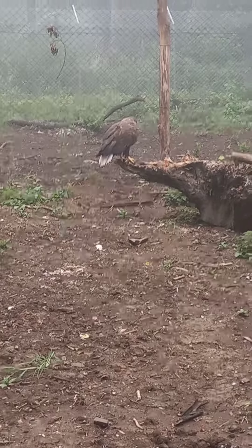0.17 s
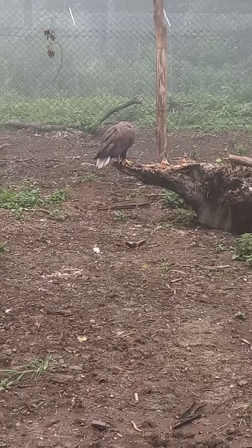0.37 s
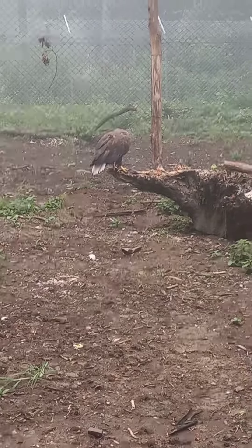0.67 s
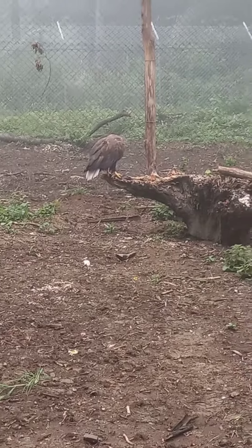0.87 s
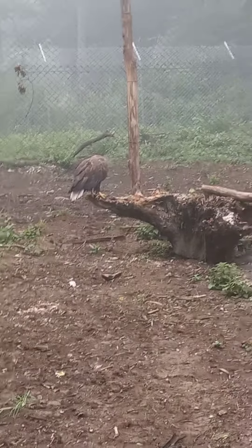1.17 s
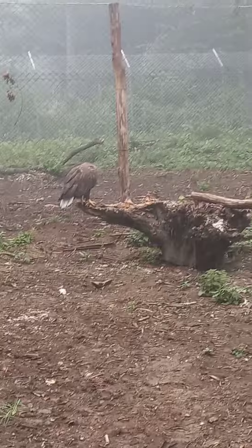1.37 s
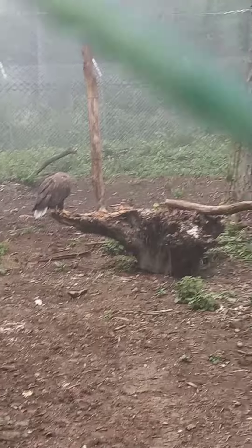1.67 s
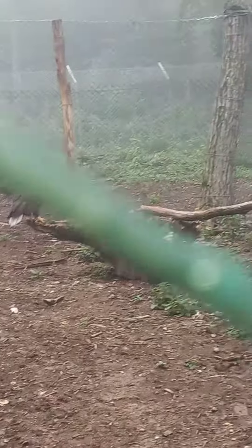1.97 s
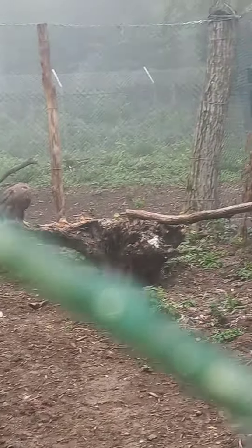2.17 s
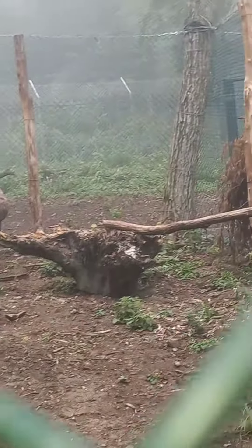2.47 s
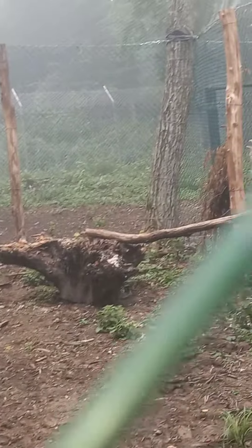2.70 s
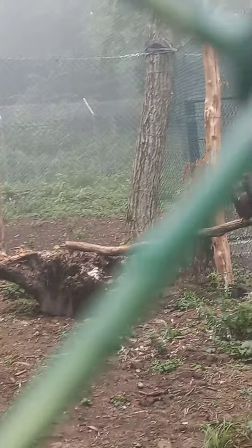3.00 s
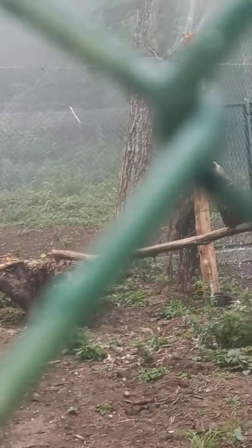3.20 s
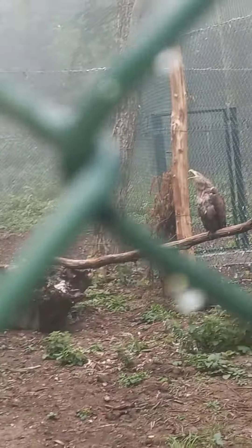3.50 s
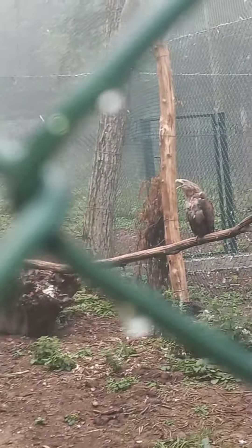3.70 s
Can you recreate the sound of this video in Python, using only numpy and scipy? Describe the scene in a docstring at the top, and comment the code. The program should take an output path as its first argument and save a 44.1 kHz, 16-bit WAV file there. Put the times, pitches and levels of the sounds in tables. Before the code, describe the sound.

An eagle gives fast, even, hoarse whistled yelps from start to end, each closing in a low cluck, with short woodland echoes; very faint small birds and quiet hiss behind, heard in stereo, slightly right.

```python
"""Eagle in foggy woods

An eagle yelps about four times a second in a fenced clearing; trunks and ground scatter each yelp.
Each yelp is a gliding whistle with breath noise in throat resonances, ending in a low pulsed cluck.
Small birds lisp and twitter far off as blurred tones, and a dove coos as a plain falling sine.
Shaped noise makes the distant rumble and microphone hiss; one short noise tick is a drop on the fence."""
import sys
import numpy as np
from scipy import signal
from scipy.fft import rfft, irfft, next_fast_len
from scipy.io import wavfile
from scipy.ndimage import uniform_filter1d

SR = 44100
rng = np.random.default_rng(int(sys.argv[2]) if len(sys.argv) > 2 else 0)


def to_wav(s):
    """Save 16-bit WAV."""
    ch = np.atleast_2d(s).T  # columns
    pcm = np.round(np.clip(ch, -1, 1) * 32767)  # PCM
    wavfile.write(sys.argv[1], SR, pcm.astype(np.int16))


N = 169785
LEAD = 8820  # samples of bird and echo computed ahead of the first one heard

# throat resonances of the eagle: centre_hz, width_hz, level_db
THROAT = [(1240, 177, -5), (1672.4, 146, 6), (2020, 210, -0.5), (2297, 417, -8)]


def from_db(db):
    """Decibels to amplitude."""
    return 10 ** (np.asarray(db) / 20)


def rms_one(x):
    """Scale to an rms of 1."""
    return x / np.sqrt(np.mean(x ** 2) + 1e-20)


def at_hz(points, hz, order=1):
    """One column of a table, read along log frequency."""
    return np.interp(np.log(hz + 1e-9), np.log(np.array(points)[:, 0]), np.array(points)[:, order])


def drift(rate_hz, size):
    """Random wander of rms 1: noise through a double low-pass pole at rate_hz."""
    settle = 4410
    r = np.exp(-2 * np.pi * rate_hz / SR)
    wander = signal.lfilter([1], [1, -2 * r, r * r], rng.standard_normal(size + settle))
    return rms_one(wander[settle:])


def resonate(x, hz, width_hz):
    """Two-pole resonance, gain about 1 on top."""
    r = np.exp(-np.pi * width_hz / SR)
    poles = [1, -2 * r * np.cos(2 * np.pi * hz / SR), r * r]
    return signal.lfilter([(1 - r * r) / 2, 0, (r * r - 1) / 2], poles, x)


def resonances(x, table):
    """Parallel resonances, each applied twice, signs alternating."""
    out = 0
    for k, (hz, width_hz, db) in enumerate(table):
        twice = resonate(resonate(x, hz, width_hz), hz, width_hz)
        out = out + (-1) ** k * from_db(db) * twice
    return out


def eagle():
    """Sum of all yelps, each a whistle, throat rasp and pulsed cluck; begins LEAD samples early."""
    # one row per yelp; later times count from the rising peak:
    # peak_s, rise_db, rise_hz, hold_start_s, hold_hz, hold_db, hold_end_db,
    # drop_s, upper_drop_db, lower_drop_db, cluck_s, cluck_db
    yelps = [(-0.05, -61, 1734, 0.024, 1978, -46, -32.5, 0.028, -20.5, -46, 0.036, -80.5),
             (0.1899, -34, 1681, 0.0269, 2105, -32.5, -41.5, 0.045, -17.5, -38.5, 0.058, -50.5),
             (0.4315, -32, 1660, 0.027, 1938, -30, -45.5, 0.043, -24, -40.5, 0.055, -55.5),
             (0.6674, -31.5, 1743, 0.022, 1975.0, -32.5, -50.5, 0.046, -33.5, -38.5, 0.051, -46.5),
             (0.9027, -32, 1774, 0.023, 1875.0, -31, -38, 0.046, -26.5, -32, 0.059, -51),
             (1.138, -33, 1759, 0.021, 1891, -32.5, -36.5, 0.041, -26, -29.5, 0.056, -47),
             (1.3732, -33.5, 1646, 0.015, 1856, -31.5, -54, 0.015, -43.5, -27.5, 0.032, -48.0),
             (1.5824, -31.5, 1803, 0.024, 1915, -27.5, -34.5, 0.036, -32.5, -32, 0.043, -54),
             (1.8145, -33.5, 1787, 0.025, 1890, -29.5, -30.5, 0.042, -36, -30.5, 0.053, -46),
             (2.044, -30, 1773, 0.023, 1922, -31.5, -35, 0.041, -37, -29.5, 0.052, -53.5),
             (2.2772, -30.5, 1731, 0.0222, 2092, -32.5, -36, 0.043, -30, -31.5, 0.064, -52),
             (2.5111, -34, 1914, 0.0195, 1898, -26, -33.5, 0.036, -33, -31.5, 0.053, -47),
             (2.7432, -29.5, 1715, 0.024, 1917, -26.5, -44.5, 0.04, -28.5, -34.5, 0.057, -54.5),
             (2.9726, -31.5, 1815, 0.024, 1991, -28.5, -40.5, 0.04, -43, -28.5, 0.053, -46),
             (3.2058, -31.5, 1742, 0.027, 2020, -28, -31.5, 0.043, -33, -34.5, 0.063, -48.5),
             (3.505, -33, 1718, 0.022, 1964, -29.5, -37.5, 0.048, -40, -30.5, 0.065, -49.5)]
    drop_length_s = .0048
    out, size = np.zeros(N + LEAD), 6615
    t = np.arange(size) / SR - .03  # s from the rising peak
    for s, rise, rise_hz, hold_s, hz, hold, end, drop_s, upper, lower, cluck_s, cluck in yelps:
        low_s = drop_s + drop_length_s
        phase, level = whistle_arch(t, rise, rise_hz, hold_s, hz, hold, end, drop_s, upper, lower, low_s)
        voice = throat_voice(phase, level, s, hz)
        voice += cluck_and_croak(t, rise, low_s, cluck_s, cluck)
        at = LEAD + int((s + t[0]) * SR)
        out[at:at + size] += voice
    return out


def whistle_arch(t, rise, rise_hz, hold_s, hz, hold, end, drop_s, upper, lower, low_s):
    """Phase and level of one whistle: it sweeps up, crests, holds and drops in two steps."""
    onset_s, onset_hz, onset_db = .014, 1230, -22  # starts before the peak; level against the rise
    crest_s, crest_hz, crest_db = 0.00897, 2327.8, -6  # level against the hold end
    upper_hz, lower_hz, drop_length_s = 1540, 1260, .0048
    hold_end_s, dip_db, dip_s = .008, -15, .0055  # the hold ends before the drop; dips between peaks
    dwell_s, dwell_hz = .003, 70
    wobble_share, flutter_db = .015, 2.0  # rms of the pitch and level wander

    top_s, crest = min(crest_s, hold_s / 2), end + crest_db
    end_s = max(drop_s - hold_end_s, hold_s)
    # s, hz
    pitch = np.array([
        (-onset_s, onset_hz), (-onset_s / 2, onset_hz + dwell_hz),
        (-dip_s, rise_hz - 3 * dwell_hz), (dwell_s, rise_hz + dwell_hz),
        (top_s, crest_hz), (top_s + dwell_s, crest_hz),
        (hold_s - dwell_s, hz), (end_s + dwell_s, hz),
        (drop_s - dwell_s / 2, upper_hz + dwell_hz), (drop_s + dwell_s / 2, upper_hz),
        (low_s, lower_hz), (low_s + 2 * dip_s, lower_hz - dwell_hz)])
    # s, db
    effort = np.array([
        (-onset_s - dip_s, rise - 45), (-onset_s, rise + onset_db), (-dip_s, rise + dip_db),
        (-dwell_s / 2, rise), (dwell_s / 2, rise),
        (top_s - dwell_s, crest + dip_db / 2), (top_s, crest),
        (hold_s - dip_s, hold + dip_db), (hold_s, hold),
        ((hold_s + end_s) / 2, (hold + end + dip_db) / 2), (end_s, end),
        (drop_s - drop_length_s, upper + dip_db), (drop_s, upper),
        (low_s, lower), (low_s + dip_s, lower + dip_db), (low_s + 3 * dip_s, lower - 50)])

    # points that would step back in time are held at the latest time so far
    glide_hz = np.interp(t, np.maximum.accumulate(pitch[:, 0]), pitch[:, 1])
    glide_hz = uniform_filter1d(glide_hz, size=60) * (1 + wobble_share * drift(300, len(t)))
    phase = 2 * np.pi * np.cumsum(glide_hz) / SR
    db = np.interp(t, np.maximum.accumulate(effort[:, 0]), effort[:, 1])
    db = db + flutter_db * drift(430, len(t))
    return phase, from_db(uniform_filter1d(db, size=60))


def throat_voice(phase, level, s, hold_hz):
    """Whistle with a hoarse octave, its ring in the throat, and breath noise in throat and beak."""
    # upper beak resonances: multiple of the hold pitch, width_hz, level_db
    beak = [(1.65, 1240, -24), (2.1, 794, -23.5), (3.0, 1480, -39)]
    # upper rasp over the scene: s, level_db
    brightness = [(0, -3.5), (2.8, 4), (3.5, 5.5)]
    overtone_db, ring_db, rasp_db = -26.5, -8, 9
    rasp_lag_s = 0.01  # the breath follows the whistle level with this time constant

    whistle = level * np.sin(phase)
    lag = np.exp(-1 / (rasp_lag_s * SR))
    breath = signal.lfilter([1 - lag], [1, -lag], level)
    air = breath * rng.standard_normal(len(level))
    octave = (level / 2 + breath * drift(440, len(level))) * np.sin(2 * phase)
    voice = whistle + from_db(overtone_db) * octave + from_db(ring_db) * resonances(whistle, THROAT)
    beak_hz = [(k * hold_hz, width_hz, db) for k, width_hz, db in beak]
    bright = from_db(np.interp(s, *np.transpose(brightness)))
    rasp = resonances(air, THROAT) + bright * resonances(air, beak_hz)
    return voice + from_db(rasp_db) * rasp


def cluck_and_croak(t, rise, low_s, cluck_s, cluck):
    """A falling low tone ends the yelp; pulses at its pitch ring throat and chest there and at the onset."""
    # chest resonance: centre_hz, width_hz, level_db
    chest = (910, 330, -13)
    cluck_hz, cluck_length_s, fall_per_s, wobble = 640, .0047, 13, .13  # fall and wobble in log pitch
    grain_db = 1.5  # rms unevenness of the cluck tone
    chop_db, chop_s, chop_spread_db = 33.5, 0.01, 4.5  # closing pulses, against the cluck tone
    croak_db, croak_s, onset_s = 4.5, 0.0067, .014  # opening pulses, against the rise

    bend = np.clip(fall_per_s * (cluck_s - t), -.4, .05) + wobble * drift(230, len(t))
    phase = 2 * np.pi * np.cumsum(cluck_hz * np.exp(bend)) / SR
    swell = np.exp(-.5 * ((t - cluck_s) / cluck_length_s) ** 2)
    tone = from_db(cluck + grain_db * drift(140, len(t))) * swell * np.sin(phase)

    # one pulse per cycle, each of its own strength
    pulses = np.diff(phase // (2 * np.pi), prepend=0) > 0
    pulses = pulses * from_db(chop_spread_db * rng.standard_normal(len(t)))
    chop = from_db(cluck + chop_db) * np.exp(-.5 * ((t - (low_s + cluck_s) / 2) / chop_s) ** 2)
    croak = from_db(rise + croak_db) * np.exp(-.5 * ((t + onset_s / 2) / croak_s) ** 2)
    body = [(hz, 2 * width_hz, db) for hz, width_hz, db in THROAT + [chest]]
    return tone + resonances(pulses * (chop + croak), body)


def ports(x):
    """Direct sound at the two microphone ports, with level and phase differences that depend on pitch."""
    # difference between the ports: hz, left_minus_right_db, left_lead_rad
    port_rows = [(595, -3.5, 0.24), (1460, -9.5, 0.67), (2250, -2.5, 1.8963), (3980, -2.5, 1.5)]
    size = next_fast_len(len(x))
    hz = np.arange(size // 2 + 1) * SR / size
    half = from_db(at_hz(port_rows, hz) / 2) * np.exp(.5j * at_hz(port_rows, hz, order=2))
    even = np.sqrt(2 / (abs(half) ** 2 + abs(half) ** -2))  # keeps the summed power of both ports
    spectrum = rfft(x, size) * even
    return np.array([irfft(spectrum * h, size)[:len(x)] for h in (half, 1 / half)])


def woods(x):
    """Lumpy echoes from trunks and ground, dying band by band, from noise unrelated left and right."""
    # scattered sound: hz, t60_s, level_db
    scatter = [(417, 0.12, -17), (805, 0.21, 0), (1390, 0.36, -17.5), (1876, 0.94, -16),
               (2700, 0.44, -11.5), (4230, 0.42, -9.5), (6100, 0.66, -3.5)]
    build_s, early_db, early_s = .018, 5, .025  # fade-in; extra early level and its decay
    lumps_db, pan_db = 3, -2  # rms unevenness; left minus right
    t = np.arange(SR) / SR
    edges, tail = 350 * 2 ** np.arange(0, 4.6, .5), 0  # half-octave bands, Hz
    for low, high in zip(edges, edges[1:]):
        hz = np.sqrt(low * high)
        band = signal.butter(2, [low, high], "band", fs=SR, output="sos")
        noise = signal.sosfilt(band, rng.standard_normal((2, SR)))
        t60 = at_hz(scatter, hz)
        decay_db = -60 * t / t60 + early_db * np.exp(-t / early_s) + lumps_db * drift(45, SR)
        shape = from_db(decay_db) * np.clip(t / build_s, 0, 1)
        # a longer decay is scaled down so that the level stands for energy
        level = from_db(at_hz(scatter, hz, order=2)) * np.sqrt(14 / (t60 * SR))
        tail = tail + noise * shape * level
    echoes = signal.fftconvolve(x[None], tail, axes=1)[:, :len(x)]
    return echoes * from_db([[pan_db / 2], [-pan_db / 2]])


def small_birds():
    """Thin high lisps and a far twitter, all as blurred notes."""
    # one list per lisp: s, pitch_hz, level_db
    lisps = [
        [(1.25, 8600, -100), (1.3, 8900, -74), (1.33, 9500, -80.5), (1.44, 9100, -86)],
        [(1.46, 8050, -88), (1.5, 8570, -76.5), (1.65, 8300, -86), (1.75, 8150, -81), (1.86, 8100, -86),
         (1.95, 8000, -78.5), (2.08, 8100, -91)],
        [(2.12, 7600, -87), (2.19, 8250, -76), (2.45, 8100, -92.5)],
        [(3.63, 8550, -101), (3.688, 8650, -66.5), (3.85, 8700, -82.5)],
    ]
    # far twitter: s, level_db
    trill = [(0, -85), (0.449, -103), (.55, -79.5), (.9, -78.5), (0.969, -69), (1.251, -88), (3.85, -96)]
    trill_hz = 6550
    out = sum(blurred_note(rows, width_hz=400) for rows in lisps)
    return out + blurred_note([(s, trill_hz, db) for s, db in trill], width_hz=320)


def blurred_note(rows, width_hz):
    """A thin far note, smeared by echoes into a narrow band, unrelated left and right."""
    s, hz, db = np.transpose(rows)
    t = np.arange(N) / SR
    carrier = np.exp(2j * np.pi * np.cumsum(np.interp(t, s, hz)) / SR)
    blur = np.array([drift(width_hz, N) + 1j * drift(width_hz, N) for _ in range(2)])
    return from_db(np.interp(t, s, db, left=-200, right=-200)) * np.real(carrier * blur)


def dove():
    """Two soft falling coos far off: a sine, the same left and right."""
    # s, pitch_hz, rms_db
    coos = [(0, 483, -73.5), (.1, 445, -96), (0.139, 460, -75.5), (0.231, 428, -73.5)]
    s, hz, db = np.transpose(coos)
    t = np.arange(N) / SR
    tone = np.sqrt(2) * np.sin(2 * np.pi * np.cumsum(np.interp(t, s, hz)) / SR)
    return from_db(np.interp(t, s, db, right=-200)) * tone


def fence_drop():
    """A drop hits the fence: a very short decaying burst of noise, the same left and right."""
    tick_s, tick_db = 1.388, -48
    out, at = np.zeros(N), int(tick_s * SR)
    out[at:at + 40] = from_db(tick_db) * rng.standard_normal(40) * np.exp(-np.arange(40) / 8)
    return out


def rumble_and_hiss():
    """Distant rumble and microphone hiss: shaped noise whose left-right likeness depends on pitch."""
    # spectrum shape: hz, relative level in dB per Hz
    spectrum_rows = [(25, -32.5), (45, -7.5), (60, 2.5), (85, 1.5), (125, -7.5), (200, -14.5), (800, -22),
                     (3000, -31), (6500, -30.5), (7600, -50), (11000, -33), (15000, -31)]
    # left-right likeness: hz, correlation (0 to 1)
    alike_rows = [(40, 1), (130, 0.1), (500, 0.36), (8000, 0)]
    floor_db = -71  # rms over both channels
    hz = np.arange(N // 2 + 1) * SR / N
    mid, side = rfft(rng.standard_normal((2, N))) * from_db(at_hz(spectrum_rows, hz))
    alike = np.clip(at_hz(alike_rows, hz), 0, 1)
    stereo = np.sqrt(1 + alike) * mid + np.sqrt(1 - alike) * side * [[1], [-1]]
    return from_db(floor_db) * rms_one(irfft(stereo, N))


def scene():
    """The eagle, direct and scattered, stands to the right and drifts slightly further right; the rest stays."""
    turn_db_per_s = -0.27  # left minus right, as the microphone swings
    bird = eagle()
    turn = from_db(turn_db_per_s / 2 * np.arange(N) / SR * [[1], [-1]])
    out = turn * (ports(bird) + woods(bird))[:, LEAD:]
    return out + small_birds() + dove() + fence_drop() + rumble_and_hiss()


def record(dry):
    """The recorder cuts the top steeply with an elliptic low-pass."""
    cutoff_hz = 15250
    return signal.sosfilt(signal.ellip(12, .5, 50, cutoff_hz, fs=SR, output="sos"), dry)


dry = scene()
out = record(dry)
to_wav(out)
```